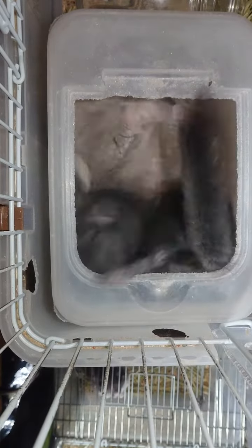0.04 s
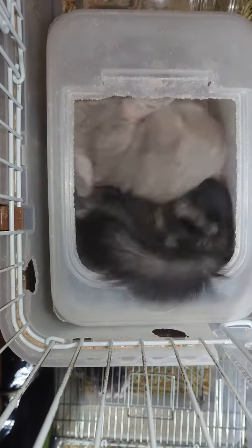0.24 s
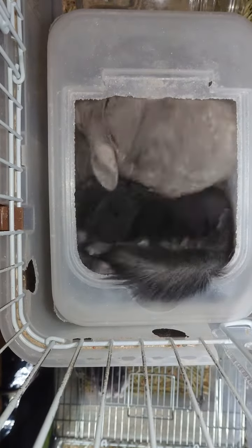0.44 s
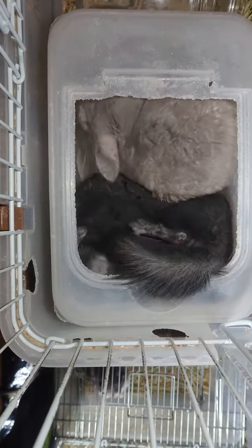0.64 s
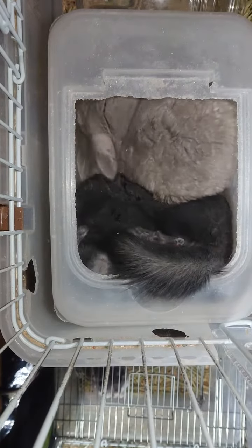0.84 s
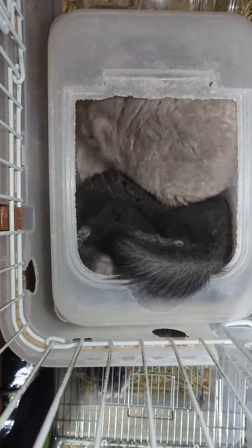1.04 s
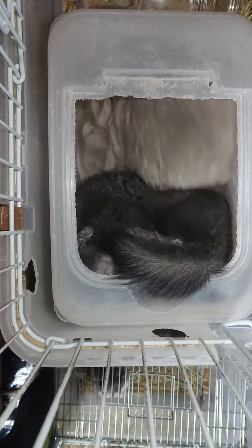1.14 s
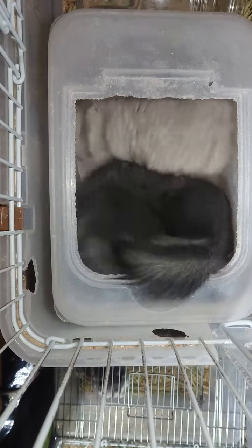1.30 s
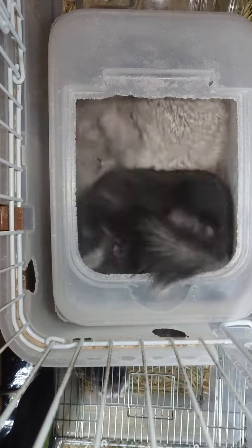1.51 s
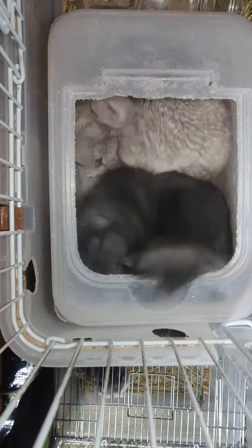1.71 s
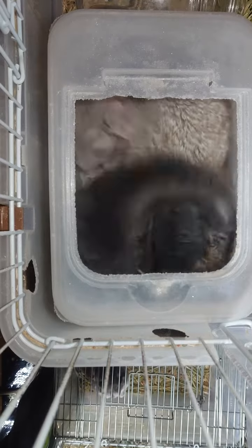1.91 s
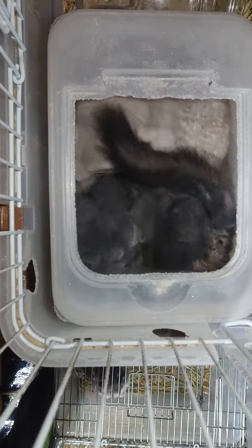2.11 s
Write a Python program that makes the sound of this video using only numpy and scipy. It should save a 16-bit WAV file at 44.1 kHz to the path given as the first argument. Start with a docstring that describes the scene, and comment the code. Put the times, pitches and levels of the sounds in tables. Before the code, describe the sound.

Small animals shuffle and tumble in a plastic case of dust, making soft, uneven rustling over a low rumble. Bodies bump the thin floor and paws tap between rolls. The microphone is close, in a quiet room.

```python
"""Fine dust hisses through fur over a low rumble: two chinchillas roll in a plastic dust-bath case.
Their bodies thump on the thin floor and rub along the walls, and their paws scratch and tap.
The case stands in a wire cage, which the harder rolls set ringing briefly; one tiny click comes
from the left. A pair of microphones sits close above the case, in a quiet room with a faint,
steady high background tone, perhaps a fan."""
import sys
import numpy as np
from scipy import signal
from scipy.fft import rfft, irfft, next_fast_len
from scipy.io import wavfile
from scipy.ndimage import uniform_filter1d

SR = 44100
rng = np.random.default_rng(int(sys.argv[2]) if len(sys.argv) > 2 else 0)


def dump(signal):
    """Clip the signal to [-1, 1] and save it as 16-bit WAV at the path in sys.argv[1]."""
    limited = np.clip(np.atleast_2d(signal).T, -1, 1)
    pcm = np.round(limited * 32767).astype(np.int16)
    wavfile.write(sys.argv[1], SR, pcm)


N = 94815
T = np.arange(N) / SR
# resonances of the cage wire, whose pitches the background tone shares:
# (frequency [Hz], gain [dB], t60 [s])
HIGH_MODES = [(1040, 6, 0.043), (1682, -6.5, 0.096), (2020, 1.5, 0.029), (2115, 1.5, 0.11),
              (3143, -15, 0.14), (3563, -20, 0.24)]


def from_db(db):
    """Decibels to gain."""
    return 10 ** (np.asarray(db) / 20)


def rms_one(x):
    """Scale to unit power."""
    return x / np.sqrt(np.mean(x ** 2) + 1e-20)


def level(rows):
    """Gain over time through points of (time [s], level [dB])."""
    return from_db(np.interp(T, *np.transpose(rows)))


def pan(db):
    """Raise the left side and lower the right, each by db."""
    return from_db([[db], [-db]])


def butter(x, order, hz, kind):
    """A Butterworth filter."""
    return signal.sosfilt(signal.butter(order, hz, kind, fs=SR, output="sos"), x)


def steep(x, hz, kind):
    """A second-order filter applied twice."""
    return butter(butter(x, 2, hz, kind), 2, hz, kind)


def colour(x, points):
    """Minimum-phase filter through points of (frequency [Hz], gain [dB])."""
    size = 2 * next_fast_len(N)
    hz, db = np.transpose(points)
    bin_hz = np.arange(size // 2 + 1) * SR / size
    gain = from_db(np.interp(np.log(bin_hz + 1), np.log(hz), db))
    cepstrum = irfft(np.log(gain))
    cepstrum[1:size // 2] *= 2
    cepstrum[size // 2 + 1:] = 0
    return irfft(rfft(x, size) * np.exp(rfft(cepstrum)))[..., :N]


def ring(x, modes):
    """Sum of decaying sines set off by x."""
    out = 0
    for hz, db, t60 in modes:
        radius, angle = from_db(-60 / (t60 * SR)), 2 * np.pi * hz / SR
        feedback = [1, -2 * radius * np.cos(angle), radius * radius]
        out = out + from_db(db) * signal.lfilter([0, np.sin(angle)], feedback, x + 1e-18)
    return out


def grains(per_s, spread_db, channels=2):
    """Random clicks of uneven size, unrelated between channels."""
    shape = (channels, N)
    sizes = from_db(spread_db * np.minimum(rng.exponential(1, shape), 4))
    return rms_one((rng.random(shape) < per_s / SR) * sizes * rng.choice([-1, 1], shape))


def contacts(per_s, spread_db, apart):
    """Clicks that both microphones share, plus some, weighted by apart, that reach only one."""
    return rms_one(grains(per_s, spread_db, channels=1) + apart * grains(per_s, spread_db))


def even(x, window_s):
    """Hold the power near one over the given window."""
    x = rms_one(x)
    power = uniform_filter1d(np.mean(x ** 2, axis=0), int(window_s * SR) + 1)
    return x / np.sqrt(power + 1e-6)


def stroke(start, length, attack_s, release_s):
    """Linear attack, hold and exponential release."""
    return np.clip((T - start) / attack_s, 0, 1) * np.exp(-np.maximum(T - start - length, 0) / release_s)


def room_tone():
    """The quiet room: faint low noise, partly shared by the two microphones."""
    # spectrum of the room: (frequency [Hz], gain [dB])
    spectrum = [(45, -1), (90, 5.5), (250, -14.5), (800, -7.5), (1500, -31), (16000, -48)]
    noise = rng.standard_normal(N) + 1.56 * rng.standard_normal((2, N))
    return from_db(-55) * rms_one(colour(noise, spectrum))


def background_tone():
    """A faint, steady high tone in the background, perhaps a fan: noise in a few narrow bands."""
    noise = np.diff(grains(per_s=600, spread_db=1.6), prepend=0)  # favours the higher bands
    tone = ring(noise, [(hz, 0, t60) for hz, _, t60 in HIGH_MODES])
    return from_db(-67) * rms_one(tone)


def dust():
    """Very fine grains run through fur in small clumps and now and then spray against the wall."""
    # dust running through fur: (time [s], relative level [dB])
    flow = [(0.15, -57), (0.29, -52.5), (0.38, -67), (0.44, -62), (0.635, -64), (0.88, -60.5),
            (0.95, -59.5), (1.23, -64), (1.32, -61.5), (1.6, -63.5), (1.65, -68), (1.69, -59),
            (1.74, -70.5), (1.8, -60), (2.1, -64)]
    # dust flung against the wall: (time [s], relative level [dB], length [s])
    sprays = [(0.158, -57.5, 0.02), (0.492, -52, 0.012), (0.725, -57, 0.0043), (0.798, -56.5, 0.0044),
              (0.904, -53.5, 0.0034), (1.011, -54.5, 0.011), (1.294, -54.5, 0.014), (1.346, -60, 0.0089),
              (1.509, -55, 0.018), (1.942, -65, 0.0098)]
    # spectrum of the hiss: (frequency [Hz], gain [dB])
    spectrum = [(300, -5), (900, 4), (3500, 2), (5800, -0.5), (10000, -5), (16000, -16.5)]
    power = level(flow) ** 2
    for start, db, length in sprays:
        power += (from_db(db) * stroke(start, length, attack_s=0.00042, release_s=2.07 * length)) ** 2
    clumps = rms_one(uniform_filter1d(rng.standard_normal(N), size=900))
    flicker_db = 2.5 * clumps
    hiss = rms_one(colour(grains(per_s=11000, spread_db=1.5), spectrum))
    return np.sqrt(power) * from_db(3.5 + flicker_db) * hiss


def floor_thumps():
    """Soft landings and the small bumps of shifting weight drive the modes of the thin floor."""
    # a body lands: (time [s], strength [dB])
    landings = [(0.17, -28.5), (0.186, -31), (0.204, -27), (0.226, -39), (0.62, -37.5), (0.656, -33.5),
                (0.667, -33.5), (1.309, -30.5), (1.322, -33), (1.508, -32), (1.519, -31), (1.55, -55),
                (1.637, -47)]
    # weight shifting on the floor: (time [s], level [dB])
    shuffle = [(0.15, -48.5), (0.2, -41.5), (0.5, -40.5), (0.59, -48), (0.66, -37.5), (0.94, -50.5),
               (1.1, -44.5), (1.23, -47.5), (1.33, -40.5), (1.66, -39.5), (1.73, -49.5), (1.86, -43.5),
               (1.96, -56), (2.15, -53.5)]
    # resonances of the floor: (frequency [Hz], gain [dB], t60 [s])
    modes = [(78.4, 1, 0.15), (101.9, -3, 0.16), (126.3, -8.5, 0.14), (193, -13, 0.056),
             (293.7, -11.5, 0.042)]
    push_s, bumps_per_s = 0.0022, 320
    push = np.zeros(N)
    for start, db in landings:
        pulse = np.sin(np.pi * np.clip((T - start) / push_s, 0, 1)) ** 2
        push += from_db(db) * pulse / pulse.sum()
    # the higher modes differ from side to side
    apart = butter(grains(bumps_per_s, spread_db=0.69), 2, 140, "high")
    shared = grains(bumps_per_s, spread_db=1.3, channels=1)
    bumps = butter(shared + 1.31 * apart, 1, 130, "low")
    rumble = level(shuffle) * even(ring(bumps, modes), window_s=0.0436)
    return pan(1.5) * steep(ring(push, modes) + rumble, 32.8, "high")


def walls(x):
    """The direct sound with the short ring of the plastic walls."""
    # resonances of the walls: (frequency [Hz], relative gain [dB], t60 [s])
    modes = [(311.4, -18, 0.22), (348, -17.5, 0.1), (509, 3.5, 0.034), (597, 6, 0.017), (736, 1, 0.079),
             (838, -10.5, 0.084), (987, -0.5, 0.086), (1160, 9, 0.0086)]
    return x + from_db(-43) * ring(x, modes)


def scratching():
    """Each paw stroke is a short burst of grains with a pitch of its own and a sandy edge."""
    # paws scratch and tap the case: (time [s], level [dB], band centre [Hz])
    scratches = [(0.177, -47, 1890), (0.176, -39.5, 376), (0.182, -44.5, 480), (0.186, -49, 2180),
                 (0.536, -52.5, 1380), (0.655, -46.5, 680), (0.796, -47.5, 1110), (0.798, -44, 436),
                 (0.906, -50.5, 1950), (0.944, -54, 1440), (0.988, -45, 1060), (1.055, -45.5, 1000),
                 (1.073, -47, 840), (1.102, -36.5, 855), (1.154, -45, 790), (1.198, -48, 475),
                 (1.296, -44, 455), (1.504, -42.5, 666), (1.52, -42, 2170), (1.756, -47, 720),
                 (1.832, -46, 710), (1.882, -51, 740), (2.049, -55, 750)]
    length_s, edge_ratio = 0.0029, 1.94
    grit = contacts(per_s=3500, spread_db=3.9, apart=1.37)
    sand = from_db(-17) * rms_one(steep(grit, [2550, 6150], "band"))
    out = 0
    for start, db, hz in scratches:
        band = even(steep(grit, [hz / edge_ratio, hz * edge_ratio], "band"), window_s=0.0057)
        envelope = from_db(db) * stroke(start, length_s, attack_s=0.0007, release_s=0.007)
        out = out + envelope * (sand + band)
    return pan(0.26) * walls(out)


def rubbing():
    """Fur and dust stick and slip on the plastic; each rub has its own brightness and eases off."""
    # a body rubs along the case: (time [s], length [s], level [dB], brightness [dB])
    rubs = [(0.181, 0.035, -39, -13), (0.234, 0.049, -42.5, -14), (0.287, 0.15, -50, 6),
            (0.471, 0.08, -51, 8.5), (0.603, 0.0091, -46.5, -10), (0.649, 0.076, -45.5, -4),
            (1.066, 0.14, -55.5, 11.5), (1.296, 0.067, -43.5, 7), (1.353, 0.037, -39.5, 3),
            (1.401, 0.075, -54, 7), (1.494, 0.14, -42, 3.5), (1.578, 0.12, -44, -5)]
    # spectrum of the friction: (frequency [Hz], gain [dB])
    spectrum = [(50, -11), (200, 2.5), (250, -3), (490, -1), (620, -8.5), (950, -10), (1400, -17),
                (4000, -28), (16000, -54)]
    idle_db, sag_db_per_s, split_hz = -59.5, 26.5, 770
    slips = contacts(per_s=900, spread_db=2, apart=0.84)
    friction = even(colour(walls(slips), spectrum), window_s=0.0166)
    dull = butter(friction, 1, split_hz, "low")
    bright = friction - dull
    dull_power = bright_power = from_db(idle_db) ** 2
    for start, length, db, bright_db in rubs:
        sag_db = sag_db_per_s * np.maximum(T - start, 0)
        force = from_db(db - sag_db) * stroke(start, length, attack_s=0.0092, release_s=0.029)
        dull_power = dull_power + force ** 2
        bright_power = bright_power + (force * from_db(bright_db)) ** 2
    return pan(3) * (np.sqrt(dull_power) * dull + np.sqrt(bright_power) * bright)


def cage():
    """The wire around the case rings briefly after each jolt."""
    # jolts to the cage: (time [s], strength [dB])
    jolts = [(0.649, -57.5), (1.305, -45.5), (1.349, -49), (1.508, -56), (1.591, -56), (1.622, -57)]
    knocks = np.zeros(N)
    for start, db in jolts:
        knocks[int(start * SR)] = from_db(db)
    return pan(2.9) * ring(knocks, HIGH_MODES)


def tick():
    """One tiny click on the left, dry and bright."""
    # (frequency [Hz], gain [dB])
    spectrum = [(2000, -5), (6000, -1), (8000, 17), (10500, -6), (13300, 4), (15500, -15)]
    click = np.zeros(N)
    click[int(1.3878 * SR)] = from_db(-34.5)
    return pan(10.5) * colour(click, spectrum)


def scene():
    """The bath, the cage and the quiet room, heard from just above the case."""
    room = room_tone() + background_tone()
    return room + dust() + floor_thumps() + scratching() + rubbing() + cage() + tick()


def record(dry):
    """Each of the two close microphones colours the treble in its own way; the top is cut."""
    # response of the microphones: (frequency [Hz], left gain [dB], right gain [dB])
    response = [(1550, -0.5, -1), (3660, -4.5, -2.5), (6050, -9, -3), (6970, -11.5, -11),
                (7220, -30.5, -15), (9020, -15, -26.5), (10350, -5.5, -28), (11800, -6, -38),
                (13000, -11, -16), (16200, 5, -11.5)]
    cutoff_hz = 15850
    left = colour(dry[0], [(hz, db) for hz, db, _ in response])
    right = colour(dry[1], [(hz, db) for hz, _, db in response])
    top_cut = signal.ellip(12, .2, 80, cutoff_hz, fs=SR, output="sos")
    return signal.sosfilt(top_cut, np.array([left, right]))


dry = scene()
out = record(dry)
dump(out)
```